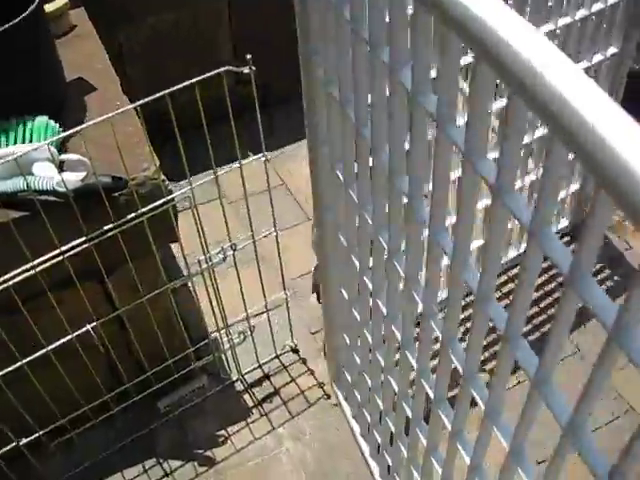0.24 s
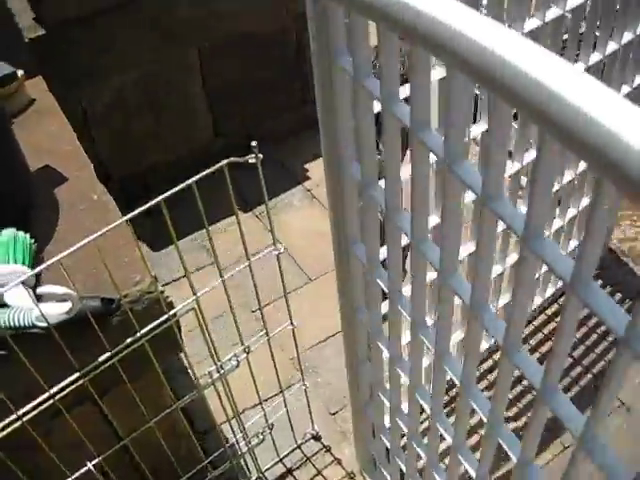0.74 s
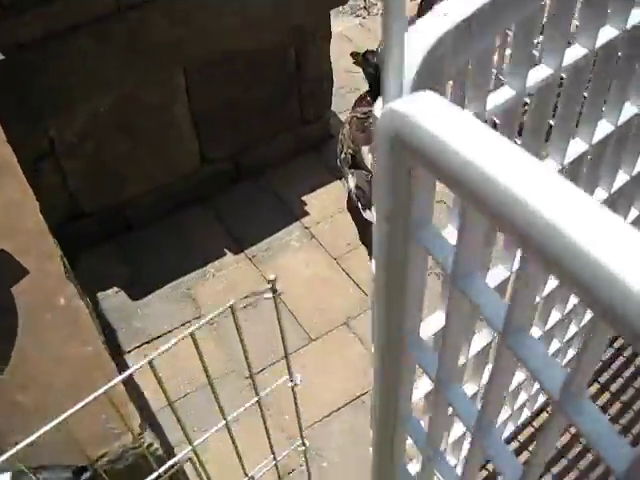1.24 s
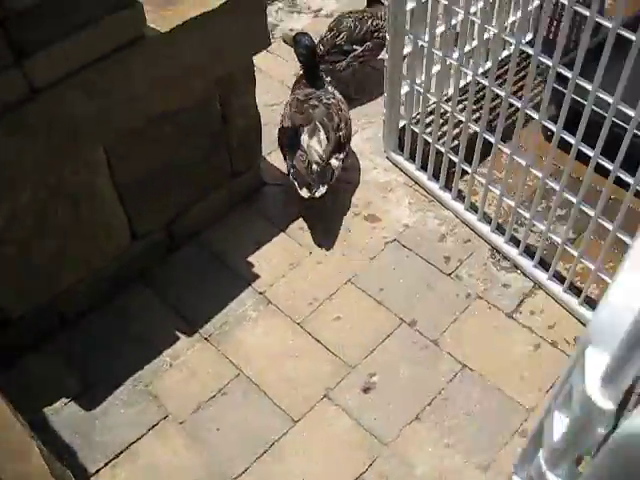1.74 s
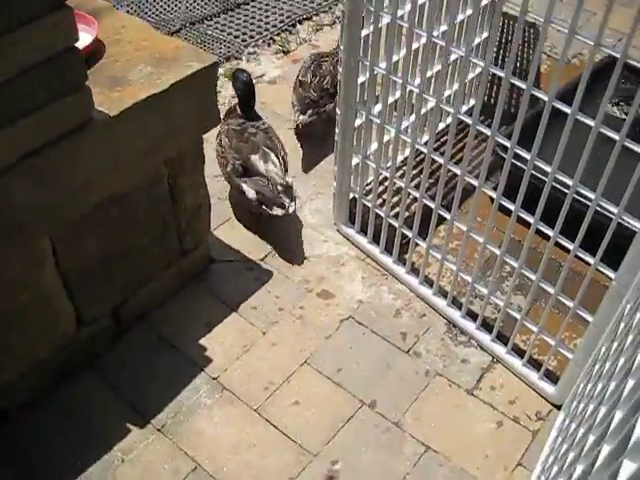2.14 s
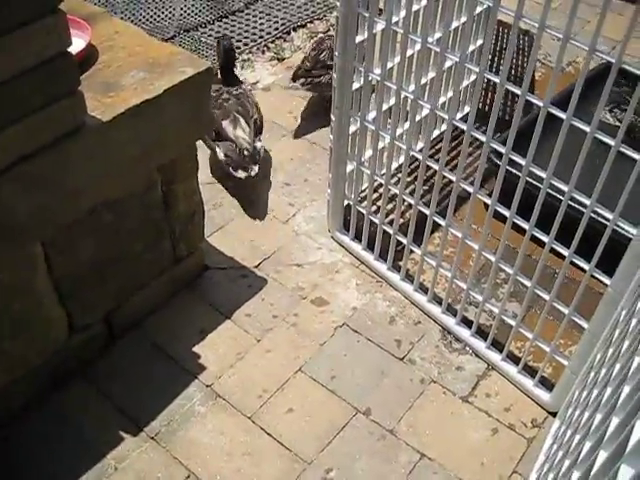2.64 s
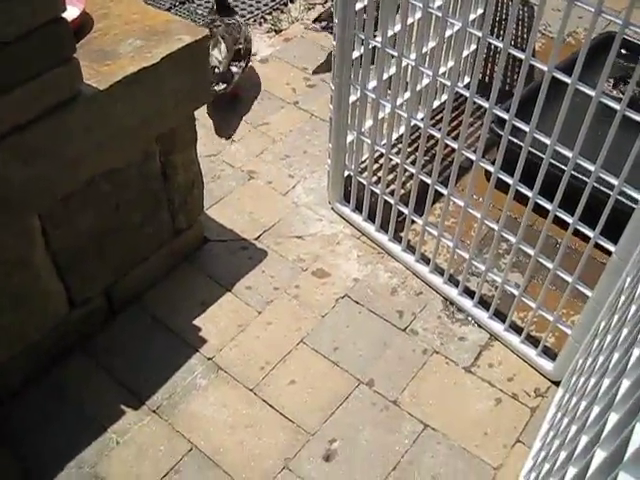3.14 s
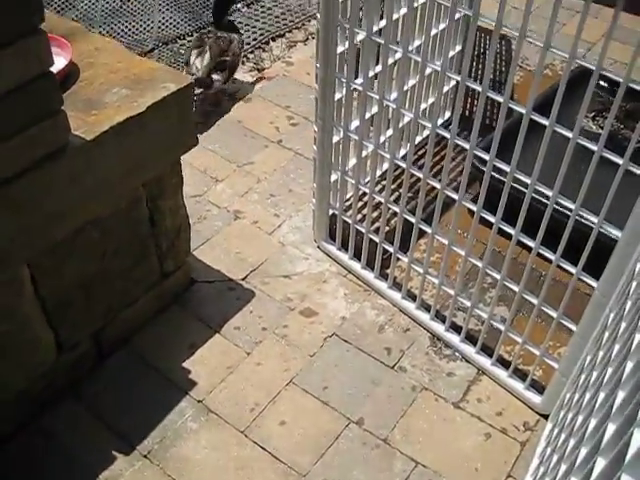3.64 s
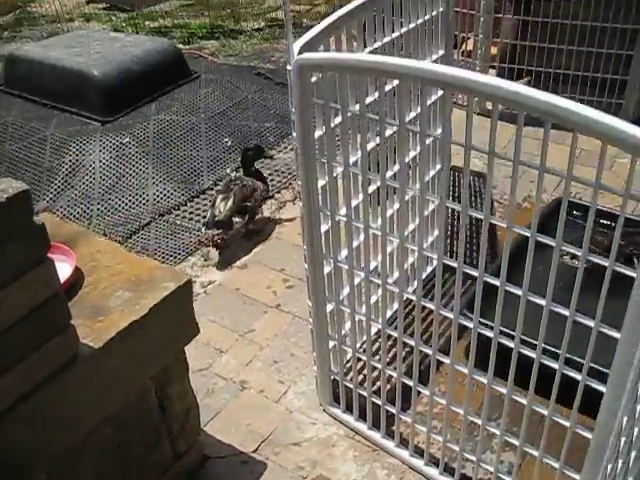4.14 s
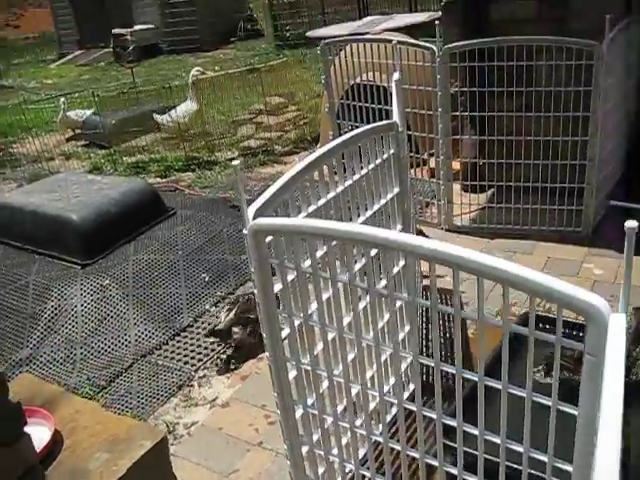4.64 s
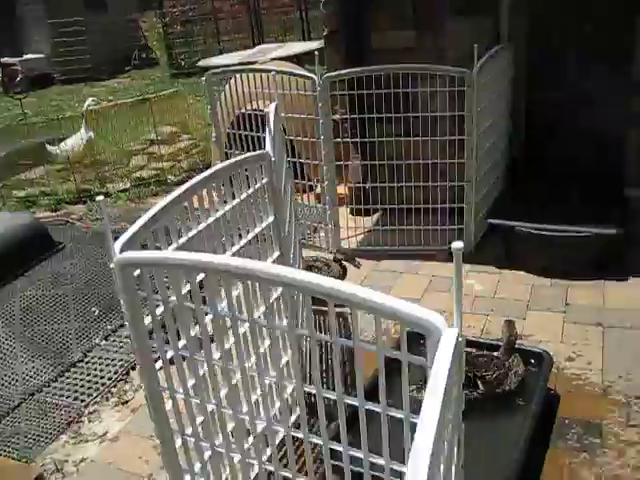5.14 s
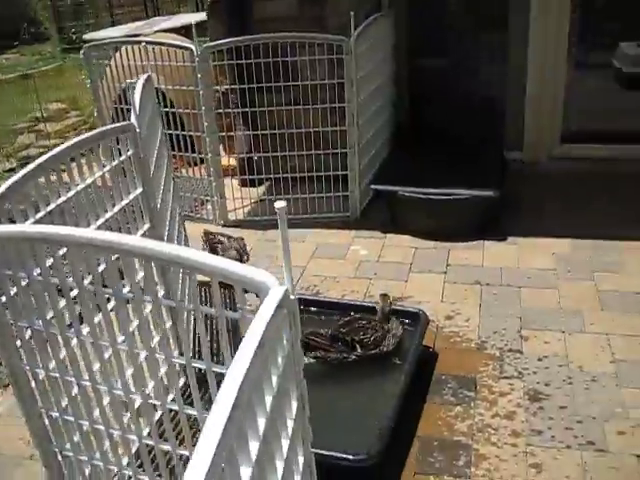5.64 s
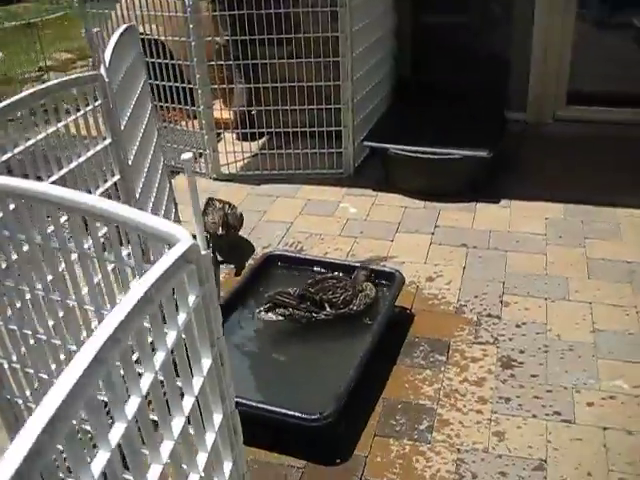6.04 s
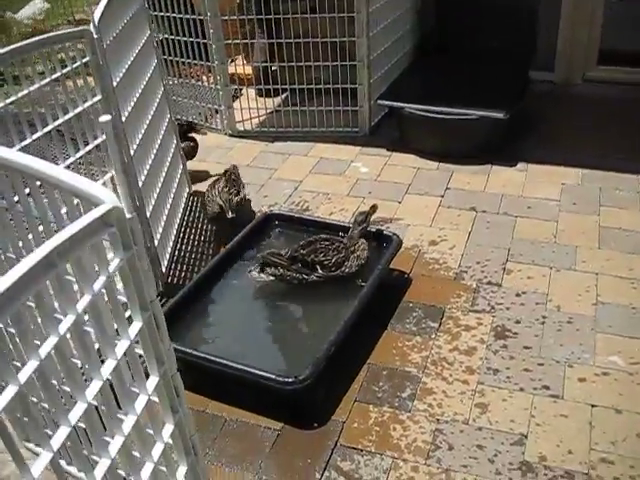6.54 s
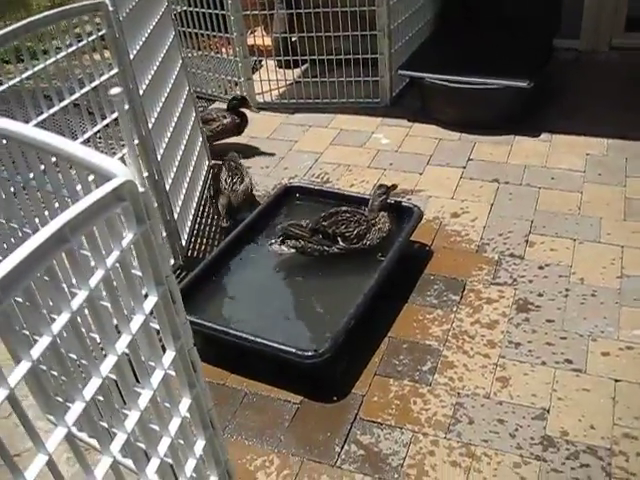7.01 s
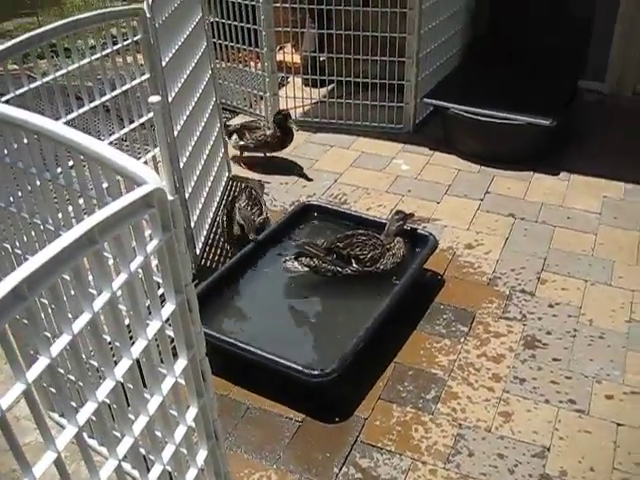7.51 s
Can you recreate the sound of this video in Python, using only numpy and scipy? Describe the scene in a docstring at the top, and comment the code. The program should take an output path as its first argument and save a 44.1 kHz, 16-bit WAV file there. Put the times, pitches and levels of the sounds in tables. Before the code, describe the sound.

Short, hoarse rasps from a drake start things off, soon joined by a female duck's nasal quacks, each call echoing slightly off house walls. Close by, light wire scrapes and jingles for about a second, and a camera's focus motor softly whirs now and then. The chatter dwindles to scattered calls, with a few small drips and a very faint sizzle late on. A low, quiet backyard rush lies underneath.

```python
"""Two ducks chatter on a paved backyard patio, thinning out as they walk off.
The hen quacks with a buzz as membranes in her throat snap shut; the drake (the male) rasps as puffs
of air make his throat whistle. Close by, thin metal brushes and jingles, a few drips tick and a lens
motor whirs now and then; faint sizzles come near the end. House walls briefly echo the ducks,
over a quiet outdoor rumble, rush and hiss."""
import sys
import numpy as np
from scipy import signal
from scipy.fft import rfft, irfft, next_fast_len
from scipy.io import wavfile
from scipy.ndimage import map_coordinates

SR = 44100
rng = np.random.default_rng(int(sys.argv[2]) if len(sys.argv) > 2 else 0)


def dump(signal):
    """Clip the signal to [-1, 1] and save it as 16-bit WAV at the path in sys.argv[1]."""
    limited = np.clip(np.atleast_2d(signal).T, -1, 1)
    pcm = np.round(limited * 32767).astype(np.int16)
    wavfile.write(sys.argv[1], SR, pcm)


N = 342657
FULL_DB = -20  # a full-strength call in the ducks' tables

# the tones her throat rings at: (frequency [Hz], width [Hz], level [dB])
HEN_THROAT = [(232, 230, -13), (745, 270, -4), (1082, 235, 2), (1527, 330, 2), (1900, 410, -4),
              (2550, 710, -4), (3300, 370, -9), (3873, 325, -7), (5140, 780, -16), (6630, 590, -23.5)]
# the highs that a harder quack lifts: (frequency [Hz], share of the lift [0-1])
HEN_HIGHS = [(1700, 0), (2600, 0.94), (3700, 1)]
# the lows that a deeper quack lifts: (frequency [Hz], share of the lift [0-1])
HEN_CHEST = [(300, 1), (650, 0.64), (900, 0.85), (1150, 0.1)]
# her quacks: (peak time [s], length [s], pitch [Hz], relative level [dB], mouth tone [Hz], rasp [dB])
QUACKS = [(0.571, 0.056, 143.7, -23.5, 930, -5), (1.801, 0.066, 172, -25, 1120, -4.5),
          (2.095, 0.079, 173.3, -20, 1140, -2.5), (2.166, 0.046, 140.7, -21, 1580, -2.5),
          (2.323, 0.044, 139.2, -25.5, 1120, 3), (2.445, 0.043, 147, -21, 1850, -1),
          (2.625, 0.069, 169.3, -22, 1335, -3), (3.008, 0.085, 179.2, -19.5, 1430, 2.5),
          (3.273, 0.049, 172.6, -28, 1550, -3.5), (3.43, 0.062, 178, -18.5, 1260, 2.5),
          (3.829, 0.068, 177.1, -19, 1400, -0.5), (4.308, 0.06, 177.7, -19.5, 1400, -1.5),
          (4.652, 0.079, 194.4, -20.5, 1330, -2.5), (5.034, 0.04, 153.5, -23.5, 1810, 0.5),
          (5.205, 0.072, 175.9, -21, 1210, -4.5), (5.556, 0.061, 180.8, -18.5, 1230, -6.5),
          (5.797, 0.027, 154.5, -29.5, 1600, -0.5), (5.954, 0.018, 149.6, -35.5, 1250, -0.5),
          (6.046, .06, 168.7, -40, 776, -11), (6.503, 0.051, 166.8, -33, 1390, -5),
          (6.647, 0.051, 186.4, -34, 810, -10), (7.128, 0.055, 157.6, -21.5, 1250, -11),
          (7.463, 0.057, 173.3, -21.5, 1245, -13.5)]

def hen(jitter_s=.00018, puff_cycles=.3, open_db=3.0, open_lead_s=.0046, mouth_octaves=.19):
    """Membranes snap shut in sharp, slightly uneven pulses, each followed by a puff of air."""
    track, t = np.zeros(N), np.arange(-SR // 8, SR // 8) / SR
    cycles = np.arange(-15, 16)
    for s, length, pitch_hz, db, mouth_hz, rasp_db in QUACKS:
        rise, fall = .52 * length, .48 * length
        snap_times = cycles / pitch_hz + rng.normal(0, jitter_s, len(cycles))
        snap_samples = np.clip(np.searchsorted(t, snap_times), 0, len(t) - 1)
        pulses = np.bincount(snap_samples, amp(rng.normal(0, 3.5, len(cycles))), len(t))
        puff_decay = np.exp(-pitch_hz / (puff_cycles * SR))
        puffs = signal.lfilter([1], [1, -puff_decay], pulses) * rng.standard_normal(len(t))
        pressure = swell(t, rise, fall, attack=5.0)
        leak = .5 * amp(-.66 * rasp_db)  # in a dull quack the membranes seal less well
        source = pressure * (unit(pulses) + leak * unit(puffs))
        chest_db = .8 + .7 * (FULL_DB - db) + .23 * rasp_db  # soft or hoarse quacks sit deeper
        honk_db = 6 - .47 * rasp_db  # less rasp, more nasal honk
        neck = 1 + .054 * rng.standard_normal()  # the neck stretches a little from call to call
        voice = ring(source, lambda hz: resonances(HEN_THROAT, hz * neck)
                     + honk_db * hump(hz, mouth_hz, mouth_octaves)
                     + rasp_db * along(HEN_HIGHS, hz) + chest_db * along(HEN_CHEST, hz))
        # the bill is widest in mid-call, and only then lets the highs out in full
        opening = swell(t + open_lead_s, rise, fall) ** .45
        highs = filtered(voice, lambda hz: along(HEN_HIGHS, hz))
        voice = voice + highs * (amp(open_db) * opening - 1)
        add(track, s + t[0], at_level(near_echoes(voice, echo_db=-11, spread_s=.014), pressure, db))
    return track


# the tones his throat whistles at: (frequency [Hz], width [Hz], level [dB])
DRAKE_THROAT = [(1183, 124, -3.5), (1526, 166, -6.5), (1840, 120, -0.5), (2258, 133, -1), (2887, 150, -2)]

def whistle(flow, mouth_hz, mouth_octaves=.42):
    """Flowing air sets the drake's throat ringing; his mouth favours the tones near mouth_hz."""
    def throat(hz):
        return sum((-1) ** k * amp(db) * 1j * hz * width / (centre ** 2 - hz ** 2 + 1j * hz * width)
                   for k, (centre, width, db) in enumerate(DRAKE_THROAT))
    return unit(filtered(flow, lambda hz: throat(hz) * hump(hz, mouth_hz, mouth_octaves)))


# the tones of air forced through his throat: (frequency [Hz], width [Hz], level [dB])
DRAKE_BREATH = [(1290, 260, 12), (1840, 300, -7), (2830, 350, 16.5), (3580, 460, 8.5), (4720, 620, 7),
                (5540, 730, 3), (6110, 910, 3), (6830, 510, -3), (9900, 3200, -22)]
# his rasps: (peak time [s], length [s], relative level [dB], mouth tone [Hz], breathiness [dB])
RASPS = [(.167, 0.052, -22, 1880, 5), (0.268, .048, -41, 1810, 4), (0.378, 0.05, -20.5, 1960, 2.5),
         (0.495, 0.045, -37.5, 1830, 10), (0.766, 0.053, -20.5, 2000, 5.5), (0.972, 0.049, -17, 2120, 7.5),
         (1.278, 0.053, -21, 2050, 7.5), (1.490, 0.056, -17, 2140, -2), (1.684, 0.028, -37, 1600, 9),
         (1.805, 0.055, -21.5, 2030, -2), (2.006, 0.073, -20, 2060, 1.5), (2.318, .06, -19, 1970, 5),
         (2.524, 0.054, -20, 2100, 4.5), (2.802, 0.029, -30, 1470, 1), (2.859, 0.062, -24, 2000, 3.5),
         (3.066, 0.051, -22, 2180, 7.5), (3.407, 0.058, -28.5, 1820, 8), (3.509, .045, -27, 1500, 5.5),
         (3.625, .064, -24, 2020, 8.5), (3.726, .04, -26.5, 1540, -4), (3.917, .04, -31.5, 1960, 3),
         (3.964, 0.065, -25, 1970, 8), (4.181, 0.063, -23.5, 2150, 8), (4.429, 0.099, -36, 1530, 12.5),
         (4.568, 0.051, -23, 1910, 7.5), (4.805, 0.047, -23, 1930, 10), (4.865, 0.074, -35.5, 1520, 8.5),
         (5.132, 0.12, -33.5, 1520, 7), (5.336, 0.096, -36, 1430, 5), (5.77, 0.068, -36, 1770, 6),
         (6.037, 0.067, -39, 1610, 3), (6.262, 0.063, -39, 1700, 8.5), (6.469, 0.09, -40.5, 1680, 12.5),
         (7.245, .044, -31.5, 1880, 4)]

def drake(saturation=.24, closure=.38, waver_cycles=.15, breath_db=-17):
    """Slow puffs of air drive a reedy, breathy whistle; a soft low grunt leads into each rasp."""
    track, t = np.zeros(N), np.arange(-SR // 8, SR // 8) / SR
    grunts = [(s - .05, length, db - 23.5, 1550, breathy_db) for s, length, db, _, breathy_db in RASPS]
    for s, length, db, mouth_hz, breathy_db in RASPS + grunts:
        rise, fall = .53 * length, .47 * length
        puff_hz = 80.6 + .4 * (db - FULL_DB)  # more effort, faster puffs
        phase = puff_hz * t + waver_cycles * wobble(62.2, len(t))
        puffs = np.exp(2 * closure * np.cos(2 * np.pi * phase)).clip(0, np.exp(closure))
        pressure = swell(t, rise, fall, attack=3.1)
        flow = rng.standard_normal(len(t))
        # the bill opens as the call starts, bringing out the higher tones
        opening = np.clip(1.474 + 1.04 * t / rise, 0, 1)
        tone = (1 - opening) * whistle(flow, .72 * mouth_hz) + opening * whistle(flow, mouth_hz)
        strength = np.abs(signal.hilbert(tone)) + 1e-9
        reed = unit(tone / strength ** saturation)  # squeezes the whistle's loudest moments
        breath = unit(filtered(rng.standard_normal(len(t)), lambda hz: amp(resonances(DRAKE_BREATH, hz))))
        voice = pressure * puffs * (reed + amp(breath_db + breathy_db) * breath)
        add(track, s + t[0], at_level(near_echoes(voice, echo_db=-12.5, spread_s=.02), pressure, db))
    return track


# the tone of the scrape: (frequency [Hz], level [dB])
SCRAPE_TONE = [(300, -6.5), (2000, -13), (4000, -5), (6500, -2.5), (9200, 2), (11000, 2), (14000, -1),
               (16000, 0)]
# the notes the metal rings at: (frequency [Hz], level [dB], time to fade by 60 dB [s])
METAL_NOTES = [(9060, -9, .16), (9360, -2, .16), (10420, 5, 0.081), (10900, -6, .12), (11500, -21, 0.32),
               (12200, -8, .14), (12780, -4, .14), (14130, 0, .12), (15300, -18, .15)]
# brushing strokes: (time [s], level [dB], time to fade by 60 dB [s])
STROKES = [(2.073, -37, 0.1), (2.108, -32, .12), (2.152, -31.5, .2), (2.287, -28.5, 0.38),
           (2.369, -25.5, 0.7), (2.458, -31, 0.81), (2.586, -21.5, 0.32), (2.752, -36.5, .14),
           (2.85, -38, .11), (2.898, -32.5, .55), (2.975, -31.5, .4), (3.04, -34, 0.15), (3.263, -30, .23),
           (4.057, -40, .15), (4.392, -39.5, .3), (5.635, -39, 0.24)]

def brushed_metal(rise_s=.0082, grain_db=1.0, ring_db=-11):
    """Each stroke catches quickly, slides out in a grainy hiss and leaves the thin metal ringing."""
    t, power = np.arange(N) / SR, np.zeros(N)
    for s, db, fade_s in STROKES:
        catch = np.clip((t - s) / rise_s, 0, 1)
        slide = amp(db - 60 * np.maximum(t - s - rise_s, 0) / fade_s)
        power += (catch * slide) ** 2
    scrape = np.sqrt(power) * unit(noise(SCRAPE_TONE, N) * amp(grain_db * wobble(400, N)))
    age = t[:SR // 2]
    metal = sum(amp(db - 60 * age / fade_s) * np.sin(2 * np.pi * hz * age)
                for hz, db, fade_s in METAL_NOTES)
    jingle = unit(signal.fftconvolve(scrape, metal)[:N])
    return scrape + amp(ring_db) * np.std(scrape) * jingle


# drips landing: (time [s], relative level [dB], pitch [Hz])
DRIPS = [(5.638, -14.5, 9100), (5.921, -22.5, 9700), (5.96, -31, 5200), (6.127, -32, 4070),
         (7.27, -22.5, 9400)]

def drips(gain_db=-6, sharpness=5, ring_cycles=54):
    """Tiny impacts tick brightly. All ring for the same number of cycles, so low ones last longer."""
    track, t = np.zeros(N), np.arange(SR // 20) / SR
    for s, db, pitch_hz in DRIPS:
        band = lambda hz: 1 / np.hypot(1, 2 * sharpness * np.log((hz + 1) / pitch_hz))
        burst = unit(filtered(rng.standard_normal(len(t)), band))
        add(track, s, amp(db + gain_db - 60 * t * pitch_hz / ring_cycles) * burst)
    return track


# the tone of a sizzle: (frequency [Hz], level [dB])
SIZZLE_TONE = [(5000, -10), (9000, -9), (11000, -6), (13400, 1), (14200, -11), (16000, -10)]
# the sizzles: (peak time [s], level [dB])
SIZZLES = [(7.42, -52), (7.665, -44.5), (7.76, -48)]

def sizzles(rise_s=.054, fall_s=.03, grain_db=3.5):
    """Faint, very high, grainy noise swells and dies a few times near the end."""
    t = np.arange(N) / SR
    level = sum(amp(db) * swell(t - s, rise_s, fall_s) for s, db in SIZZLES)
    return level * unit(noise(SIZZLE_TONE, N) * amp(grain_db * wobble(200, N)))


# the tone of the motor: (frequency [Hz], level [dB])
MOTOR_TONE = [(600, -18), (1400, 0), (2400, 9.5), (3000, 3.5), (3600, 7), (4600, 3.5), (5300, 3.5),
              (6000, -40), (9000, -33)]
# when the motor runs: (start [s], end [s])
MOTOR_RUNS = [(1.557, 1.93), (3.4, 3.928), (5.26, 5.71), (7.123, 7.6)]

def lens_motor(level_db=-46, ramp_s=.062):
    """The focus motor whirs softly in short runs."""
    t = np.arange(N) / SR
    running = sum(np.clip(np.minimum(t - start, end - t) / ramp_s, 0, 1) for start, end in MOTOR_RUNS)
    return amp(level_db) * running * noise(MOTOR_TONE, N)


def near_echoes(x, echo_db, spread_s, count=7):
    """Paving, fence and wall add weak copies of a call, different at every spot."""
    paths = np.zeros(SR // 10)
    paths[0] = 1
    delays = rng.uniform(.0008, spread_s, count)
    paths[(delays * SR).astype(int)] += amp(echo_db) * rng.normal(0, 1, count)
    return signal.fftconvolve(x, paths)[:len(x)]


# how long the patio echoes: (frequency [Hz], time to fade by 60 dB [s])
PATIO_FADE = [(200, 1), (2000, 0.22), (6000, 0.32), (14000, 0.069)]

def patio_echo(x, build_s=.0037):
    """The walls send back a blurred echo whose highs die first."""
    hz, t, spectrum = signal.stft(rng.standard_normal(SR // 2), SR, nperseg=256)
    fade = amp(-60 * t / along(PATIO_FADE, hz)[:, None])
    tail = signal.istft(spectrum * fade * (1 - np.exp(-t / build_s)), SR, nperseg=256)[1]
    return signal.fftconvolve(x, tail / np.linalg.norm(tail))[:N]


# the tones of the yard's three noises, each: (frequency [Hz], level [dB])
RUMBLE_TONE = [(12, -38), (20, -7), (92, -0.5), (156, -1.5), (264, -2), (375, -3.5), (440, -5), (767, -4.5),
               (900, -7), (1170, -27), (1980, -120)]
RUSH_TONE = [(400, -6.5), (800, -3), (1300, 2), (2000, -0.5), (3000, -5.5), (5000, -9.5), (8000, -20)]
HISS_TONE = [(2000, 10), (4500, 7.5), (7000, -0.5), (9700, 3.5), (11000, 1.5), (14000, -0.5), (16000, -44)]
# how the rush rises and falls: (time [s], relative level [dB])
RUSH_LEVEL = [(0, -40.5), (.35, -47), (1.3, -54), (1.7, -43), (3.2, -44), (4.8, -46), (5.4, -46),
              (6.9, -46.5), (7.77, -44)]

def yard(rumble_db=-48.5, rush_gain_db=-2.0, hiss_db=-47):
    """A far rumble, a restless mid-pitched rush and a fine fluttering hiss fill the background."""
    t = np.arange(N) / SR
    rumble = amp(rumble_db) * noise(RUMBLE_TONE, N)
    rush_db = np.interp(t, *np.transpose(RUSH_LEVEL)) + rush_gain_db
    rush = amp(rush_db + 2.6 * wobble(15, N)) * noise(RUSH_TONE, N)
    fade_db = 2.5 * np.maximum(t - 3, 0)  # the hiss holds for 3 s, then fades
    hiss = amp(hiss_db - fade_db + 2.7 * wobble(38, N)) * noise(HISS_TONE, N)
    return rumble + rush + hiss


def amp(db):
    """Turn decibels into a volume multiplier."""
    return 10 ** (np.asarray(db) / 20)


def unit(x):
    """Scale to an average (rms) level of 1."""
    return x / np.sqrt(np.mean(x ** 2) + 1e-20)


def along(points, hz):
    """Read between (frequency, value) points, spacing octaves evenly."""
    f, v = np.transpose(points)
    return np.interp(np.log(hz + 1), np.log(f), v)


def hump(hz, centre_hz, octaves):
    """A smooth bump around one frequency."""
    return np.exp(-(np.log2((hz + 1) / centre_hz) / octaves) ** 2)


def resonances(tones, hz):
    """The level in dB that a set of ringing tones gives each frequency."""
    power = sum(amp(db) ** 2 / (1 + (2 * (hz - centre) / width) ** 2) ** 2 for centre, width, db in tones)
    return 10 * np.log10(power + 1e-9)


def filtered(x, response):
    """Turn each frequency of x up or down by response(hz)."""
    size = next_fast_len(len(x) + 4096)
    return irfft(rfft(x, size) * response(np.fft.rfftfreq(size, 1 / SR)), size)[:len(x)]


def ring(x, colour_db, size=2048):
    """Shape the tone of x so that it rings after each pulse, never before."""
    cepstrum = irfft(np.log(amp(colour_db(np.fft.rfftfreq(size, 1 / SR))) + 1e-6))
    cepstrum[1:size // 2] *= 2
    cepstrum[size // 2 + 1:] = 0
    return signal.fftconvolve(x, irfft(np.exp(rfft(cepstrum))))[:len(x)]


def noise(tone, size):
    """Noise with the given tone, at level 1."""
    return unit(filtered(rng.standard_normal(size), lambda hz: amp(along(tone, hz))))


def wobble(rate, size):
    """A smooth curve through `rate` random points a second."""
    return map_coordinates(rng.standard_normal(int(size * rate / SR) + 4), [np.arange(size) * rate / SR])


def add(track, s, x):
    """Mix x into the track from time s on."""
    start = round(s * SR)
    lo, hi = max(start, 0), min(start + len(x), N)
    if lo < hi:
        track[lo:hi] += x[lo - start:hi - start]


def swell(t, rise, fall, attack=2):
    """A rise and fall that peaks at t = 0; a higher attack starts more abruptly."""
    return np.exp(-np.abs(t / np.where(t < 0, rise, fall)) ** np.where(t < 0, attack, 2))


def at_level(x, pressure, db):
    """Scale a call so that its level at full pressure is db."""
    return amp(db) * unit(x) * np.sqrt(np.mean(pressure ** 2))


def scene():
    """Both ducks in the patio's echo, with the small close sounds and the yard behind."""
    ducks = amp(-3.0) * hen() + amp(-1.23) * drake()
    echo = amp(-18.5) * patio_echo(ducks)
    return (ducks + echo + brushed_metal() + drips() + sizzles() + lens_motor() + yard())[None]


def record(dry, peak_limit=.35, notch_hz=7900, notch_width_hz=650, top_hz=15820):
    """The camera rounds off sharp peaks, scoops out one band of treble and cuts the very top."""
    rounded = dry[0] / (1 + (dry[0] / peak_limit) ** 4) ** (1 / 4)
    notch = lambda hz: np.abs(hz - notch_hz) / np.hypot(hz - notch_hz, notch_width_hz)
    return filtered(rounded, lambda hz: notch(hz) * (hz < top_hz))[None]


dry = scene()
out = record(dry)
dump(out)
```